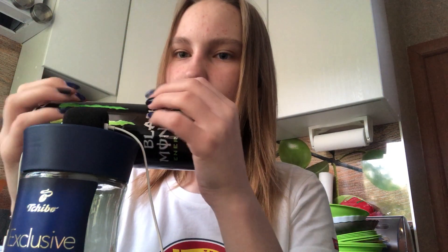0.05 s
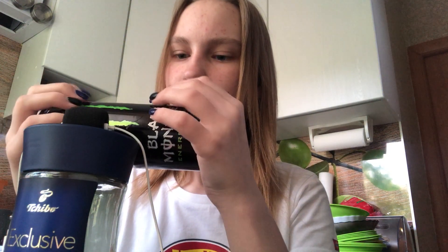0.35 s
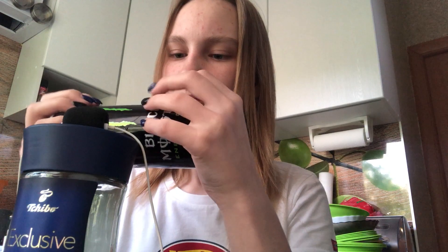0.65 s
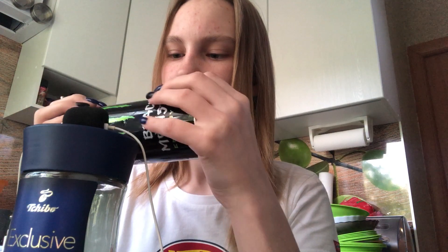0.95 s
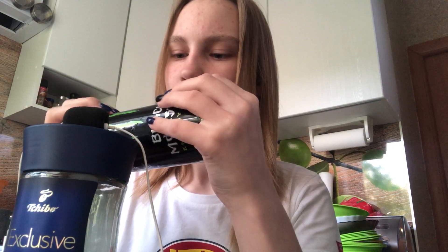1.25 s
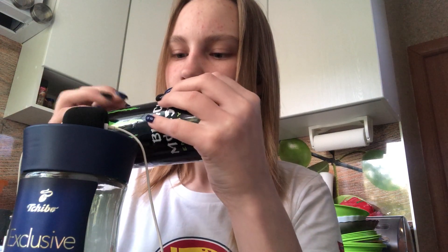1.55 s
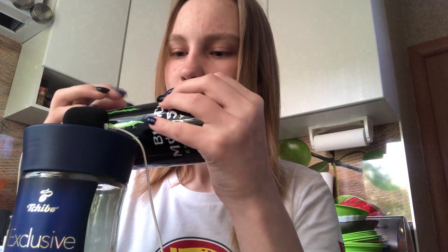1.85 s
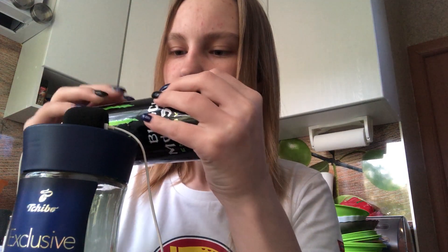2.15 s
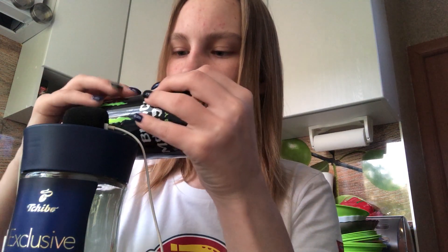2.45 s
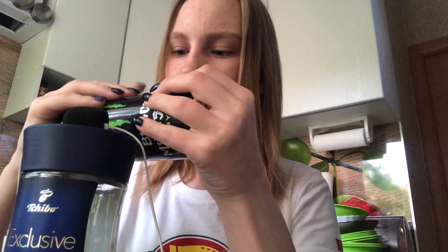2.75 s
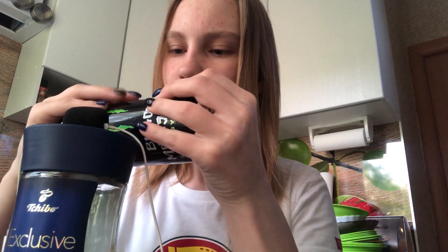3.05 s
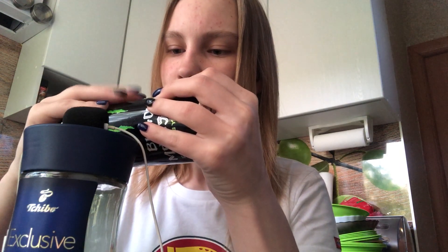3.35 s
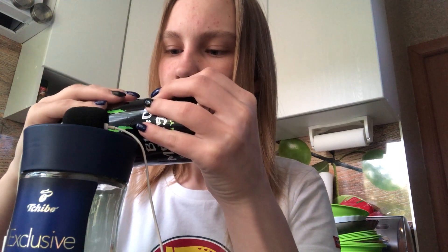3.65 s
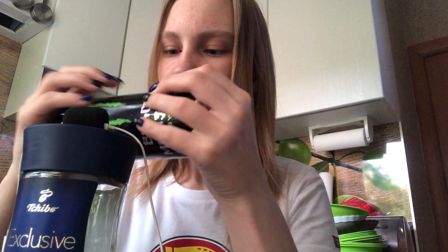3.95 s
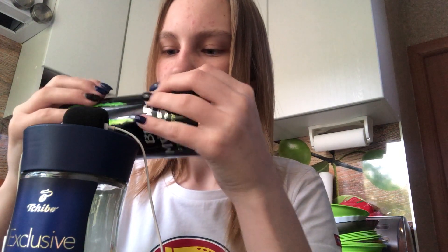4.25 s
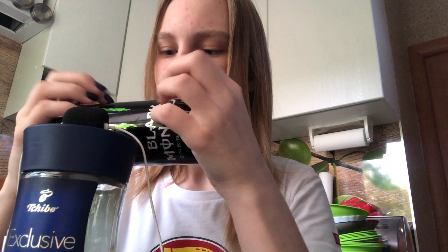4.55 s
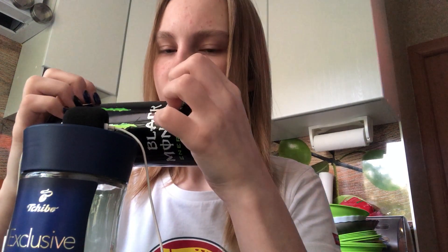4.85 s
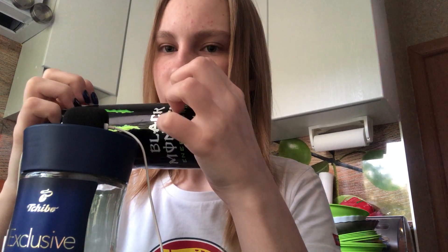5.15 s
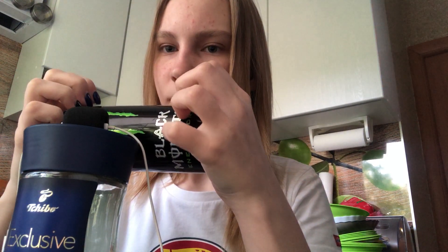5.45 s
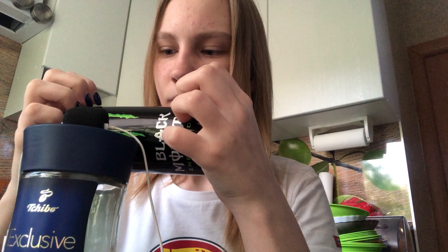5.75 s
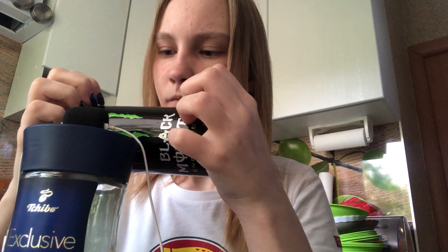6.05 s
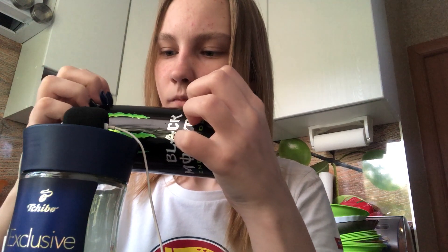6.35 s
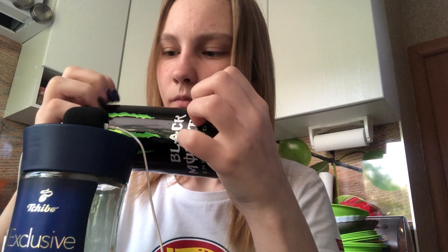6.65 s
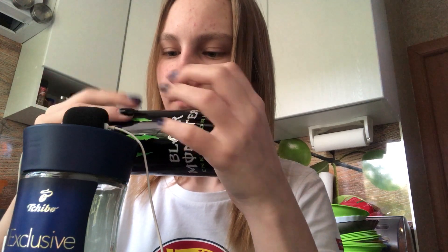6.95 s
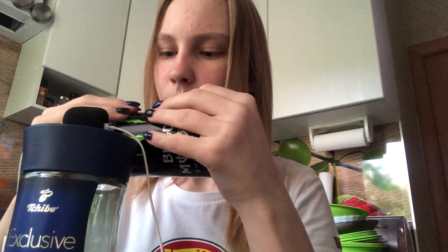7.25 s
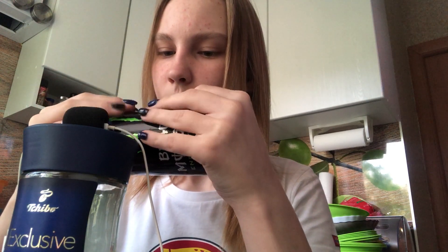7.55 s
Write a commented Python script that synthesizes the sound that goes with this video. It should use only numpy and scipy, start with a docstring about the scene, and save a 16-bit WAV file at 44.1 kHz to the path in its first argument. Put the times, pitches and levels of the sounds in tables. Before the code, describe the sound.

Long fingernails tap an aluminium drink can held against a foam-covered microphone, very close and dry, over faint kitchen hiss. It opens with a short scratch and a cluster of light ticks. From about 0.5 to 2.4 seconds the taps are sparse, with faint fingertip rubbing and a low bump against the foam near 0.9 seconds. Dry ticks come more thickly from 2.4 to 3.7 seconds, mixed with small scrapes. Around 4 to 4.3 seconds the grip shifts with dull knocks and soft thuds. From 4.6 to 6.6 seconds the nails drum quickly and unevenly on the can's end, the loudest passage, with bright clicks, short metallic ringing and knocks. After a brief pause, lighter taps and scratches return around 7 seconds. At 7.4 seconds a scrape and flick set the can ringing briefly, followed by a few last ticks until about 7.7 seconds.

```python
"""Long fingernails tap an aluminium drink can held against a foam-covered microphone in a quiet kitchen.
Each impact excites the can's modes: taps mostly on the hand-damped wall give dry ticks, while a drum roll
on the stiff end rings and knocks. Between taps, stick-slip friction makes nails scratch and fingertips
hiss on the paint. The can bumps the microphone, and once, loosely held, it rings on in free vibration."""
import sys
import numpy as np
from scipy import signal
from scipy.fft import rfft, irfft, next_fast_len
from scipy.io import wavfile
from scipy.ndimage import uniform_filter1d

SR = 44100
rng = np.random.default_rng(int(sys.argv[2]) if len(sys.argv) > 2 else 0)


def dump_mix(stems):
    """Bounce the given channels to the path in sys.argv[1] as a 16-bit WAV at rate SR."""
    frames = np.atleast_2d(stems).T  # one column per channel
    limited = np.clip(frames, -1, 1)  # hard clip at full scale
    pcm = np.round(limited * 32767).astype(np.int16)
    wavfile.write(sys.argv[1], SR, pcm)


N = 339129
TIME = np.arange(N) / SR
AGE = TIME[:8192]  # seconds since an impact


def undb(db):
    """Decibels to amplitude ratio."""
    return 10 ** (np.asarray(db) / 20)

def unit_rms(x):
    """Power normalisation: scale a steady sound to rms 1."""
    return x / np.sqrt(np.mean(x ** 2))

def equal_energy(x):
    """Energy normalisation: scale a transient to the energy of 10 ms at rms 1."""
    return x / np.sqrt(np.sum(x ** 2) / (SR / 100))

def decay(t60):
    """Exponential damping: the amplitude falls 60 dB in t60 seconds."""
    return np.exp(-np.log(1000) * AGE / t60)

def damped_sine(hz, t60):
    """Impulse response of a damped oscillator."""
    return np.sin(2 * np.pi * hz * AGE) * decay(t60)

def add(out, start, x):
    """Superposition: mix a transient in at start seconds."""
    i = max(int(start * SR), 0)
    out[i:i + len(x)] += x[:max(N - i, 0)]

def colour(x, spectrum, tilt_db=0):
    """Minimum-phase filter through (Hz, dB) points, tilted by tilt_db an octave above 3 kHz."""
    size = next_fast_len(len(x) // 2 + 1) * 2
    octave = np.log2(np.maximum(np.arange(size // 2 + 1) * SR / size, 1))
    hz, db = np.transpose(spectrum)
    db = np.interp(octave, np.log2(hz), db) + tilt_db * np.maximum(octave - np.log2(3000), 0)
    cepstrum = irfft(np.log(undb(db)))
    cepstrum[1:size // 2] *= 2  # folding the cepstrum makes the filter causal
    cepstrum[size // 2 + 1:] = 0
    return irfft(rfft(x, size) * np.exp(rfft(cepstrum)))[:len(x)]

def noise_burst(t60, spectrum):
    """Broadband transient: damped noise with a given spectral envelope."""
    return equal_energy(colour(rng.standard_normal(len(AGE)) * decay(t60), spectrum))

def ring(modes, scatter_db, detune, upper_db=0):
    """Modal superposition: a random strike point weights each mode, and the grip shifts its pitch."""
    out = 0
    for hz, db, t60 in modes:
        size, shift, side = rng.standard_normal(3)
        gain = np.sign(side) * undb(db + scatter_db * size + upper_db * (hz > 3000))
        out = out + gain * damped_sine(hz * (1 + detune * shift), t60)
    return equal_energy(out)

# Spectrum of kitchen rumble and microphone hiss. Each row: frequency in Hz, relative level in dB.
FLOOR_SPECTRUM = [(20, -5.5), (52, 0), (80, -6.5), (125, -12.5), (185, -2.5), (215, -8), (265, -4),
                  (360, -13.5), (600, -16), (1200, -20.5), (2500, -22), (6000, -25), (11000, -25),
                  (16000, -26)]
def background(noise_db=-58, hum_db=-70, mains_hz=50):
    """Stationary noise floor: broadband rumble and hiss with a weak mains tone."""
    noise = unit_rms(colour(rng.standard_normal(N), FLOOR_SPECTRUM))
    hum = unit_rms(np.sin(2 * np.pi * mains_hz * TIME))
    return undb(noise_db) * noise + undb(hum_db) * hum

def kitchen_reverb(x, t60=0.16, wet_db=-19, build_s=0.0077):
    """Diffuse reverberation: reflections from cupboards and walls merge into a faint, decaying tail."""
    t = TIME[:SR // 2]
    envelope = np.exp(-np.log(1000) * t / t60) * np.clip(t / build_s, 0, 1)
    tail = rng.standard_normal(len(t)) * envelope
    tail = colour(tail / np.linalg.norm(tail), [(100, -0.5), (1000, 2.5), (3000, 3.5)], tilt_db=-2)
    return undb(wet_db) * signal.fftconvolve(x, tail)[:N]

# Nudges of the can against the microphone. Each row: start in seconds, level in dB, frequency in Hz.
FOAM_BUMPS = [(.165, -40, 115), (0.926, -28.5, 128), (0.936, -31.5, 35.4), (1.46, -37, 104),
              (2.551, -41, 115), (3.956, -35, 95), (4.0086, -36, 120), (4.271, -35, 110),
              (4.295, -33.5, 59.4), (4.32, -40, 70), (6.912, -40, 107), (7.309, -41, 56.3)]
def foam_bumps(cycles=2.5):
    """Heavily damped oscillation: the can thuds into the foam and settles within a few cycles."""
    out = np.zeros(N)
    for start, db, hz in FOAM_BUMPS:
        add(out, start, undb(db) * damped_sine(hz, cycles / hz))
    return out

def stick_slip(per_second, spread_db):
    """Stick-slip friction: a dense train of tiny impulses, random in time and size."""
    caught = rng.random(N) < per_second / SR
    slips = caught * rng.standard_normal(N)
    return unit_rms(slips * undb(spread_db * np.minimum(rng.exponential(size=N), 4)))

def stroke(start, length, attack_s=0.022, release_s=0.1):
    """Amplitude envelope with linear ramps: a finger sets off, glides and lifts."""
    rise = np.clip((TIME - start) / attack_s + .5, 0, 1)
    fall = np.clip((start + length - TIME) / release_s + .5, 0, 1)
    return rise * fall

# Spectrum of skin rubbing on paint. Each row: frequency in Hz, relative level in dB.
FRICTION_SPECTRUM = [(500, -9), (1300, -7), (1750, 4), (2300, -4), (5000, -5.5), (5500, -7), (6800, 0),
                     (8700, 2.5), (9400, -0.5), (10500, 5), (13000, -1), (16000, -1)]
# Glides of a fingertip. Each row: start in seconds, length in seconds, level in dB.
FINGER_STROKES = [(0, .25, -65.5), (0.796, 0.19, -70.5), (1.169, 0.14, -59.5), (1.335, 0.14, -63),
                  (2.037, 0.24, -59.5), (2.307, 0.21, -63), (2.68, 0.077, -60), (2.89, 0.052, -53),
                  (3.824, 0.29, -61), (4.222, 0.18, -58), (4.48, 0.29, -59.5)]
def finger_slides(rasp_hz=5840, rasp_width_hz=450, rasp_db=-8.5, creep_db=-73, flutter_db=3.5):
    """Friction noise: a gliding fingertip hisses unsteadily, and a narrow wall resonance adds a rasp."""
    flutter = unit_rms(uniform_filter1d(uniform_filter1d(rng.standard_normal(N), size=700), size=700))
    friction = unit_rms(colour(stick_slip(per_second=8000, spread_db=2.8), FRICTION_SPECTRUM))
    resonance = signal.iirpeak(rasp_hz, rasp_hz / rasp_width_hz, fs=SR)
    rasp = unit_rms(signal.lfilter(*resonance, rng.standard_normal(N)))
    gliding = sum(undb(db) * stroke(start, length) for start, length, db in FINGER_STROKES)
    envelope = np.hypot(gliding, undb(creep_db))  # the holding fingers always creep a little
    return (friction + undb(rasp_db) * rasp) * envelope * undb(flutter_db * flutter)

# Short drags of a nail. Each row: centre in seconds, Gaussian width in seconds, level in dB.
NAIL_SCRATCHES = [(.006, 0.0089, -42.5), (.068, 0.0089, -56), (.27, 0.01, -55), (.345, .013, -54),
                  (3.115, 0.02, -58), (3.171, 0.004, -51), (3.33, .011, -56), (3.378, 0.0035, -53),
                  (3.56, 0.026, -55.5), (3.83, 0.013, -54), (3.967, 0.015, -52.5), (6.92, 0.0068, -53),
                  (7.165, .008, -52), (7.183, 0.0073, -47), (7.41, .011, -45.5), (7.431, 0.0096, -37.5),
                  (7.57, .02, -52), (7.655, 0.016, -52.5)]
def nail_scratches(modes_db=-5):
    """Forced vibration: the catches of a dragging nail edge drive the wall's impulse response."""
    pressure = sum(undb(db) * np.exp(-.5 * ((TIME - centre) / width) ** 2)
                   for centre, width, db in NAIL_SCRATCHES)
    catch = equal_energy(colour(signal.unit_impulse(len(AGE)), WALL_SPECTRUM))
    response = catch + undb(modes_db) * ring(WALL_RESONANCES, scatter_db=-7, detune=0.0091)
    force = pressure * stick_slip(per_second=9000, spread_db=0)
    return signal.fftconvolve(force, response / np.linalg.norm(response))[:N]

# Spectrum of the whole can's recoil. Each row: frequency in Hz, relative level in dB.
RECOIL_SPECTRUM = [(25, -33), (80, -6), (190, 1), (310, 1), (450, -3), (750, -5.5), (1400, -19),
                   (5000, -89)]
def recoil():
    """Rigid-body motion: an impulse shoves the whole can, giving one short, dull knock."""
    return equal_energy(colour(signal.unit_impulse(len(AGE)), RECOIL_SPECTRUM))

# Fingertips landing flat as the grip changes. Each row: start in seconds, level in dB.
GRIP_CONTACTS = [(0.531, -49.5), (4.011, -43.5), (4.275, -43), (4.9742, -48), (7.424, -51.5)]
def grip_knocks(flex_db=-8, flex_t60=0.0099):
    """Soft impact: a flat fingertip shoves the can and flexes its wall with a dull, hollow note."""
    out, knock = np.zeros(N), recoil()
    for start, db in GRIP_CONTACTS:
        flex = noise_burst(flex_t60, [(300, -11), (1050, -3), (1500, 0), (4000, -16)])
        add(out, start, undb(db) * (knock + undb(flex_db) * flex))
    return out

# Modes of the loosely held can. Each row: frequency in Hz, relative level in dB, T60 in seconds.
LOOSE_RESONANCES = [(674, -15, 0.18), (1030, -1.5, 0.23), (970, -13, 0.24), (1070, -18, 0.22),
                    (1347, -12, 0.6), (1660, 8, 0.088), (1860, -14, .12), (1970, 7, 0.11),
                    (2140, -10, 0.13), (2300, -15, .14), (3290, -13, 0.12), (3340, -3, 0.13),
                    (4500, -6, .12)]
def loose_ring(start=7.437, db=-35.5, rasp_db=-6, rasp_t60=0.08):
    """Free vibration: flicked by a nail, the loose can rings on, its close pairs of modes beating."""
    out = np.zeros(N)
    modes = ring(LOOSE_RESONANCES, scatter_db=-3, detune=0.0034)
    partners = ring(LOOSE_RESONANCES, scatter_db=-3, detune=0.0275)
    rasp = noise_burst(rasp_t60, [(400, -19), (950, 2), (1350, -12), (1850, -1), (2700, -9), (9000, -20)])
    flick = equal_energy(modes + partners) + undb(rasp_db) * rasp
    add(out, start, undb(db) * equal_energy(flick))
    return out

def brightness(click_db, ring_db, usual_db=-43):
    """Spectral tilt in dB an octave: a firm tap is brighter; a flat nail rings more but clicks duller."""
    return 0.15 * (click_db - usual_db) - 0.2 * ring_db

def shell_click(grain, spectrum, tilt_db, t60, snap, linger_db, linger_t60=0.086, variety=1.9):
    """Modal overlap: after the nail's bright snap, crowded shell modes decay like noise; a few linger."""
    envelope = (decay(t60) + undb(linger_db) * decay(linger_t60)) * (1 - decay(0.00024))
    noise = grain + variety * rng.standard_normal(len(AGE))  # the grain is common to every tap
    crowd = colour(equal_energy(noise * envelope), spectrum, tilt_db)
    contact = equal_energy(signal.unit_impulse(len(AGE), 6))
    return equal_energy(crowd + snap * colour(contact, spectrum, tilt_db + 1.8))

def nail_bounce(click, max_gain=0.37, lag_s=0.0028):
    """Elastic rebound: the flexible nail strikes once more, very soon and more softly."""
    lag = int(SR * lag_s * (0.25 + rng.random()))
    delayed = np.pad(click, (lag, 0))[:len(click)]
    return equal_energy(click + max_gain * rng.random() * delayed)

def grazes(taps, probability=0.3, after_s=0.03, click_db=-58, ring_db=-1):
    """Secondary impacts: extra tap rows where the next finger brushes the can just after a tap."""
    chance = rng.random((len(taps), 3))
    return [(start + after_s * (.5 + late), click_db + 20 * np.log10(.5 + size), ring_db)
            for (start, _, _), (luck, late, size) in zip(taps, chance) if luck < probability]

# Modes of the can's end. Each row: frequency in Hz, relative level in dB, T60 in seconds.
END_RESONANCES = [(970, -14.5, 0.093), (1039, -7, 0.065), (1610, -12, 0.08), (1748, 5.5, 0.053),
                  (1850, 2, 0.04), (1872, 2, 0.029), (2090, -17, 0.095), (3164, -15, 0.051),
                  (3360, -2.5, 0.051), (3520, -7.5, 0.069), (3640, -16, 0.13), (6360, -14, 0.062),
                  (11000, -4, 0.013)]
# Envelope of its crowded shell modes. Each row: frequency in Hz, relative level in dB.
END_SPECTRUM = [(200, -11.5), (600, -5.5), (950, 4), (1300, -18), (2400, 1.5), (4400, 0), (6300, -0.5),
                (10500, 0.5), (13000, -2), (16500, -1)]
# Effect of where the nails land. Each row: time in seconds, gain of the modes above 3 kHz in dB.
UPPER_MODE_GAIN = [(4.6, 0.5), (5.0, -3.5), (6.3, 4.5), (7.1, 1)]
# The drum roll. Each row: start in seconds, click level in dB, relative ring and knock levels in dB.
END_STRIKES = [(4.6442, -32.5, 1.5, -8), (4.7098, -34.5, -4.5, -9.5), (4.7972, -43.5, 3.5, -2.5),
               (4.8502, -36, -2, -14), (4.8593, -48.5, 6, -16), (4.9032, -51, 0.5, -12),
               (4.952, -41.5, -4.5, -8.5), (4.9809, -49.5, -5, -1), (5.029, -33.5, -6.5, -9.5),
               (5.0663, -39.5, -2.5, -7), (5.1183, -46, 1.5, -21), (5.1833, -58.5, 10.5, 3),
               (5.2082, -42.5, -1, 1.5), (5.2589, -37, -7, -10), (5.2705, -41, 3.5, 2),
               (5.32, -33.5, -6, -11), (5.3576, -34, 1, -10), (5.476, -45, -1, 0.5),
               (5.5135, -38, -3.5, -5), (5.544, -41, -5, -6.5), (5.5745, -31, -5.5, -11),
               (5.6372, -37.5, 1.5, -13), (5.6402, -42.5, 0, -8), (5.7202, -44, -7, -4),
               (5.7618, -40.5, -3.5, -4), (5.8243, -35.5, -2.5, -6.5), (5.8587, -40.5, 1.5, -6),
               (5.899, -34, -3, -9), (5.9571, -32.5, -2.5, -5), (6.0006, -42, -6, -5),
               (6.0425, -38, -4, -3.5), (6.129, -37, -0.5, -8.5), (6.1813, -48, -0.5, -11),
               (6.224, -37, -15, -6.5), (6.2307, -33, -2.5, -5.5), (6.2842, -31, -3.5, -10),
               (6.3204, -35, -0.5, -6.5), (6.4425, -41.5, -3.5, -3.5), (6.4722, -45, 3, -4),
               (6.4962, -34.5, -5, -10), (6.5354, -29.5, -6, -13), (6.584, -33.5, 2.5, -7.5),
               (6.5936, -38, -3, -3.5)]
def drum_roll(t60=0.04, tilt_db=-3, dull_per_knock=0.18):
    """Plate vibration: the stiff end rings longer than the wall and passes each blow on as a knock."""
    out, grain, knock = np.zeros(N), rng.standard_normal(len(AGE)), recoil()
    for start, db, ring_db, knock_db in END_STRIKES:
        # the more finger pad lands with the nail, the more knock and the less treble
        tilt = tilt_db + brightness(db, ring_db) - dull_per_knock * knock_db
        click = shell_click(grain, END_SPECTRUM, tilt, t60, snap=0.39, linger_db=-27)
        upper_db = np.interp(start, *np.transpose(UPPER_MODE_GAIN))
        modes = ring(END_RESONANCES, scatter_db=4, detune=0.013, upper_db=upper_db)
        tap = undb(0.56) * click + undb(ring_db + 1) * modes + undb(knock_db + 0.5) * knock
        add(out, start, undb(db) * tap)
    return out

# Modes of the side wall. Each row: frequency in Hz, relative level in dB, T60 in seconds.
WALL_RESONANCES = [(1370, -16, 0.012), (1663, -3.5, 0.014), (1784, 2.5, 0.02), (1983, -5, 0.025),
                   (2130, -9.5, 0.018), (2434, -11, 0.018), (2860, -25.5, 0.012), (3596, -16.5, 0.031),
                   (5400, -40, 0.009)]
# Envelope of its crowded shell modes. Each row: frequency in Hz, relative level in dB.
WALL_SPECTRUM = [(300, -19.5), (800, 0), (1150, 1), (1450, -13.5), (2700, 2), (4700, -0.5), (5600, 2),
                 (7600, -0.5), (11000, 1.5), (14000, -1), (16500, -4)]
# The hand pressing the can into the foam. Each row: time in seconds, firmness from 0 to 1.
HAND_PRESSURE = [(.3, .25), (1.3, 0.04), (1.7, 0.53), (2.5, 1), (3.6, 0.75), (4.2, 0), (4.55, 0.55),
                 (7.0, 0.37), (7.6, 0.7)]
# Dry nail taps on the can, mostly on its wall, a few on its end.
# Each row: start in seconds, click level in dB, relative ring level in dB.
DRY_STRIKES = [(.0073, -46.5, -0.5), (0.0557, -44.5, -15), (0.0748, -51, -5), (.149, -50, -8),
               (.1702, -40, -3.5), (0.203, -57, -6), (0.2172, -42.5, -3.5), (.2493, -50.5, -13),
               (0.2688, -48, -14), (0.28, -51.5, -7), (0.349, -48, -3), (0.3576, -39, -3.5),
               (0.5304, -48, 3), (0.5957, -59.5, 3.5), (.944, -49.5, -6.5), (.965, -49.5, -9),
               (1.318, -49, -7.5), (1.5997, -39, -8), (1.6041, -37, -3.5), (1.7503, -57.5, 0),
               (1.826, -47.5, 1), (1.848, -53, -5), (1.998, -45.5, -5.5), (2.0152, -58, 1),
               (2.0604, -57.5, 2), (2.0962, -58, 5), (2.441, -50, -1), (2.445, -50.5, 5.5),
               (2.4893, -39, 0), (2.635, -47, -8), (2.6724, -43, 0.5), (2.6913, -52, 2),
               (2.7258, -50.5, -1), (2.761, -54, -12), (2.805, -40.5, -1.5), (2.8707, -40.5, 0.5),
               (2.909, -49.5, 4.5), (2.926, -53, 4), (2.956, -50.5, -6), (3.0072, -49.5, -0.5),
               (3.012, -49.5, 0), (3.0718, -42, 0.5), (3.116, -50, -0.5), (3.1357, -50, -7),
               (3.2114, -50, 0.5), (3.2178, -46.5, 1), (3.2624, -51, 3.5), (3.3332, -47, 6),
               (3.341, -47.5, -5), (3.426, -53, 1), (3.4321, -48, 2), (3.473, -43.5, -0.5),
               (3.538, -53, 5.5), (3.6096, -56.5, 2.5), (3.678, -48.5, 5.5), (4.01, -44, -4),
               (4.2443, -46.5, 0.5), (4.264, -42.5, -12), (4.2702, -45.5, -7), (4.4391, -52.5, -3.5),
               (4.5491, -40.5, -2), (7.004, -49, -5), (7.03, -49, -1.5), (7.2281, -48.5, 0),
               (7.296, -45, -8), (7.3058, -46.5, -5), (7.4232, -41, -7), (7.5363, -44, -8),
               (7.5453, -35.5, -5.5), (7.5774, -44, -7), (7.5813, -45.5, -5), (7.666, -49.5, -5.5)]
def dry_taps(tilt_db=-1.8, pressed_bass_db=-7, thud_hz=104.4, thud_t60=0.044):
    """Contact damping: under the hand the can ticks drily, recoils less and thuds into the foam."""
    out, grain, knock = np.zeros(N), rng.standard_normal(len(AGE)), recoil()
    thud = damped_sine(thud_hz, thud_t60)
    for start, db, ring_db in list(DRY_STRIKES) + grazes(DRY_STRIKES):
        press = np.interp(start, *np.transpose(HAND_PRESSURE))
        t60 = np.interp(press, (0, 1), (0.041, 0.02))
        knock_db = np.interp(press, (0, 1), (-9, -30))
        thud_db = np.interp(press, (0, 1), (-8.5, -1))
        tilt = tilt_db + brightness(db, ring_db)
        click = shell_click(grain, WALL_SPECTRUM, tilt, t60, snap=0.48, linger_db=-40)
        modes = ring(WALL_RESONANCES, scatter_db=3.5, detune=0.025)
        tick = nail_bounce(click) + undb(ring_db) * modes
        tick = colour(tick, [(500, pressed_bass_db * press), (1500, 0)])
        add(out, start, undb(db) * (tick + undb(knock_db) * knock + undb(thud_db) * thud))
    return out

def scene():
    """Direct and reverberant fields add: the can right at the microphone, the kitchen far behind."""
    can = dry_taps() + drum_roll() + grip_knocks() + nail_scratches() + finger_slides() + loose_ring()
    return (can + kitchen_reverb(can) + foam_bumps() + background())[None]

def record(dry, cutoff_hz=15750):
    """Band limiting: a steep elliptic low-pass removes the highest treble."""
    return signal.sosfilt(signal.ellip(8, .2, 70, cutoff_hz, fs=SR, output="sos"), dry)

dry = scene()
out = record(dry)
dump_mix(out)
```